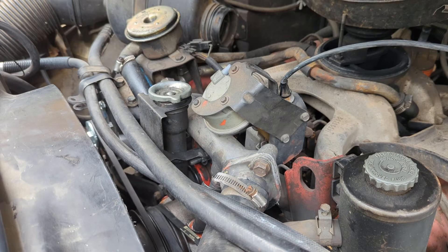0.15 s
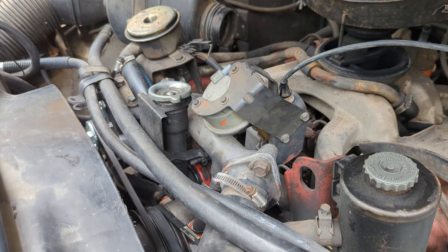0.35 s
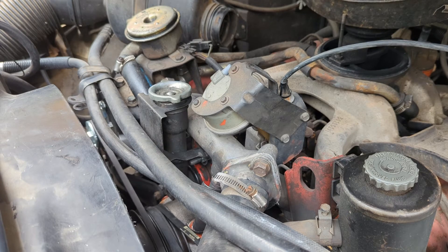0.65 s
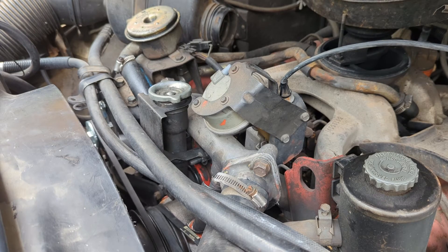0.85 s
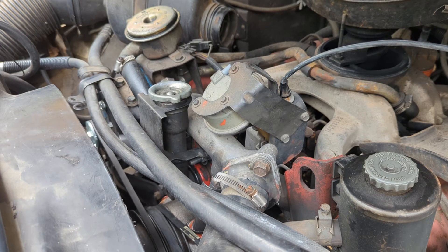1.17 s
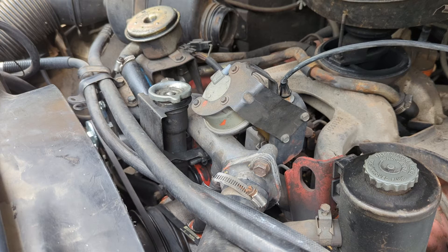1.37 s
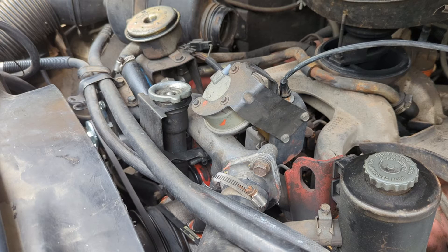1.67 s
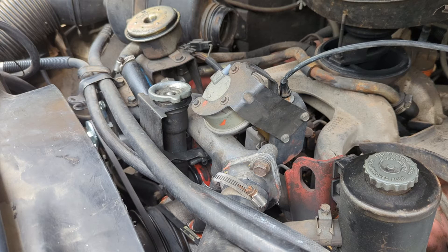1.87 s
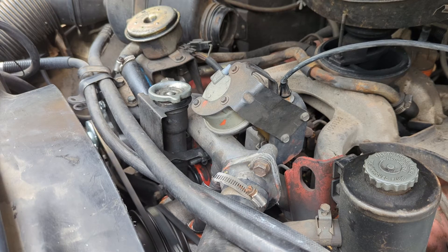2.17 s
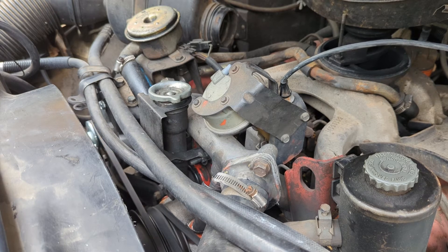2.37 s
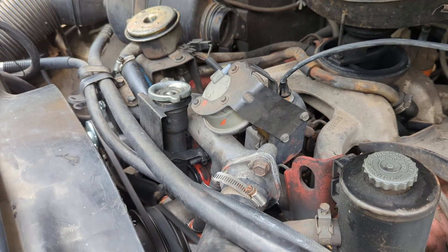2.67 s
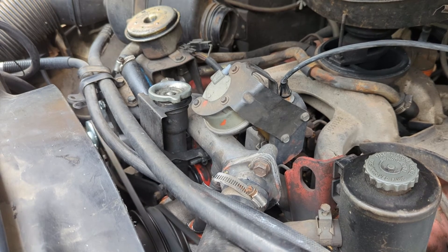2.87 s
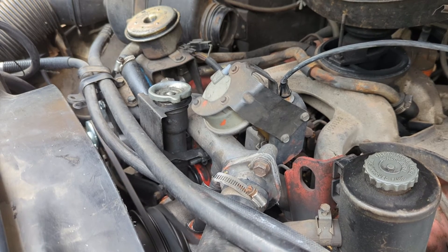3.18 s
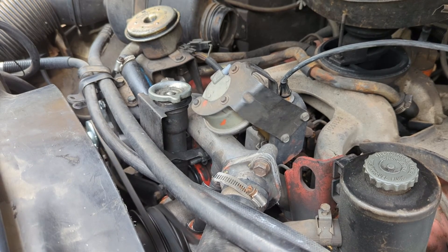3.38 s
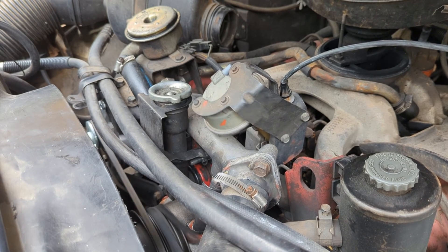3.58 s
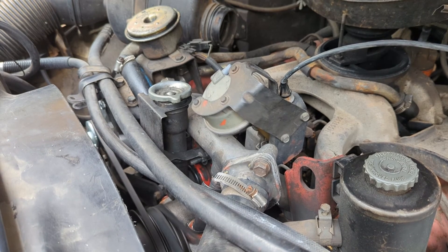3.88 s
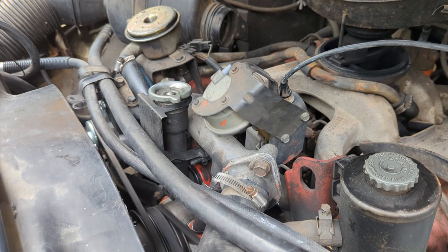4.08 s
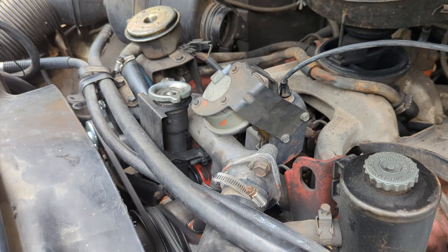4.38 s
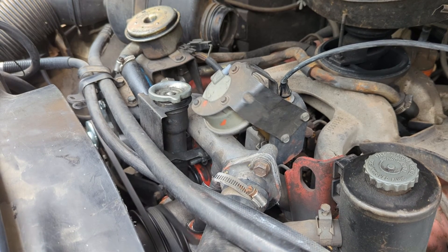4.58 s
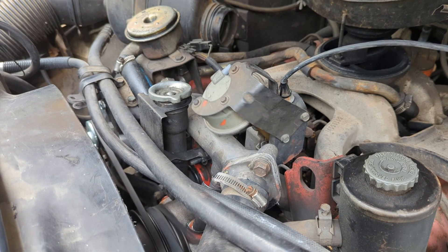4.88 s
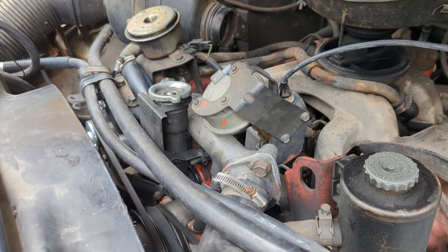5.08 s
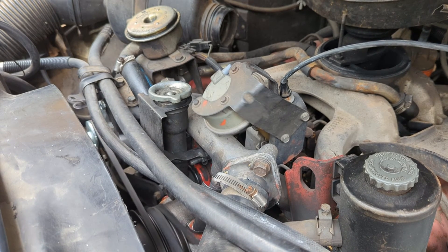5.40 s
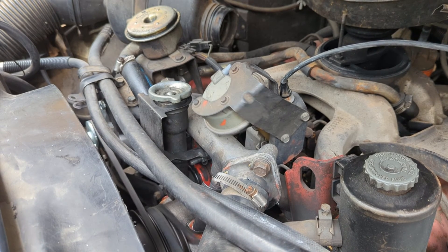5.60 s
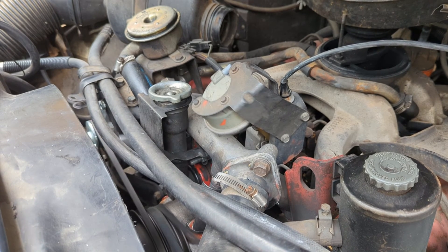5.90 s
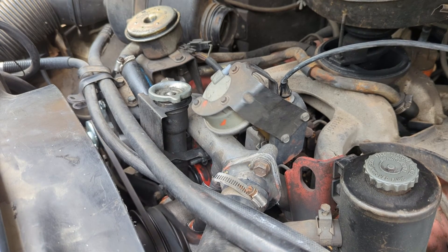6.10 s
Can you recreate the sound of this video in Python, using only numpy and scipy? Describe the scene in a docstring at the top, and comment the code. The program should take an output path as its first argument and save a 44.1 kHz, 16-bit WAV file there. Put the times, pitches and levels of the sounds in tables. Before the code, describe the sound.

In an open engine bay a thin pump whirr and two relay clunks precede a short grinding starter, then a diesel catches, flares and settles into clattering idle.

```python
"""A diesel eight starts, heard from inside the open engine bay: each firing thumps pipe and manifold modes,
knocks in the block and ticks the valve gear; the cylinders catch, flare and settle to idle.
Before that a pump whirrs as thin sine partials over brush noise, and two relays clunk as struck panel modes.
The starter whines and grinds as filtered tooth pulses and noise, then spins free with a coloured hiss."""
import sys
import numpy as np
from scipy import signal
from scipy.fft import rfft, irfft, next_fast_len
from scipy.io import wavfile
from scipy.ndimage import uniform_filter1d, minimum_filter1d

SR = 44100
rng = np.random.default_rng(int(sys.argv[2]) if len(sys.argv) > 2 else 0)


def pcm_store(signal):
    """Save signal as 16-bit PCM."""
    levels = np.round(np.clip(np.atleast_2d(signal), -1, 1) * 32767)
    wavfile.write(sys.argv[1], SR, levels.astype(np.int16).T)


N = 275625
T = np.arange(N) / SR
SIZE = next_fast_len(N + SR // 2)
F = np.arange(SIZE // 2 + 1) * SR / SIZE  # frequency grid of all filters [Hz]

# pump drift: (time [s], reference partial [Hz], level [dB]); the Hz act as a ratio to the first row
PUMP = [(0.0, 5870, -61.5), (1.03, 5865, -61), (1.2, 5855, -62), (2.02, 5820, -64)]
# pump partials at the start: (frequency [Hz], relative level [dB])
PARTIALS = [(4350, -83), (4673, -92), (5050, -88), (5394, -88), (5572, -80), (5744, -85), (5916, -72),
            (6045, -82), (6094, -87), (6325, -86), (6438, -79), (6616, -75), (6648, -85), (6788, -83),
            (6966, -77), (7004, -86), (7138, -79), (7311, -80), (7483, -76), (7558, -82), (7660, -72),
            (7994, -79), (8339, -78), (8441, -82), (8527, -79), (8699, -76), (8877, -87), (10444, -93)]
# brush fizz: (frequency [Hz], relative density [dB])
BRUSHES = [(1940, -59), (3300, -36), (4220, -3), (5310, -17.5), (5890, 8), (6310, -0.5), (7730, 7.5),
           (8670, 4), (9580, -34), (11500, -44.5), (15000, -58), (22000, -120)]
ROTOR_HZ = 174  # at the start; drifts with the partials
PUMP_LEAN_DB = 5  # left over right

# yard noise: (frequency [Hz], relative density [dB])
YARD = [(20, -20), (45, -7), (80, 0.5), (157, -10.5), (276, -29), (587, -27.5), (1550, -34.5),
        (3500, -34.5), (9500, -22.5), (15800, -30.5)]
YARD_DB = -71.5

# relay, solenoid and pinion blows:
# (time [s], contact snap [dB], panel rattle [dB], panel thud [dB], bracket ring [dB])
BLOWS = [(0.501, -35, -42.5, -50, -66), (0.524, -62, -45, -41, -93), (1.4950, -33, -31, -39, -87),
         (1.511, -60, -45, -36, -90), (2.033, -52, -50, -60, -84), (2.052, -43, -44, -60, -76),
         (2.0605, -37, -44, -60, -85), (2.082, -37, -46, -60, -85)]
# contact snap: (frequency [Hz], relative density [dB])
SNAP = [(710, -36), (1200, -18), (3070, -9), (3760, -20), (4240, -12.5), (6960, -7), (7590, -11),
        (15800, -12.5)]
# panel modes: (frequency [Hz], level [dB], t60 [s])
PANEL = [(129, -5, .22), (151, -1, .2), (188, 2, .14), (228, -9, .4), (345, -11, .12), (436, -7, .24),
         (484, 0, .09), (528, -7, .15), (592, -3, .1), (655, -6, .13), (834, -6, .11), (960, -14, .07),
         (1320, -12, .07), (1900, -17, .07)]
# bracket modes: (frequency [Hz], level [dB], t60 [s])
BRACKET = [(1367, -1, 1.3), (1884, -3, .89), (2256, -7, .8), (3252, -2, .5)]
# wash of the bay: (frequency [Hz], relative density [dB])
BAY = [(60, -16), (150, 1), (240, 1), (500, 0), (900, -10.5), (1500, -21), (2500, -27), (4000, -39)]
THUD_BELOW_HZ = 300  # modes below take only the thud, modes above only the rattle
RATTLE_S, THUD_S, THUD_CUT_HZ, BAY_DB, BAY_S = 0.0089, 0.00055, 110, -12.5, 0.048
HUM_FROM_S, HUM_TO_S, HUM_HZ, HUM_DB = 1.52, 2.03, 236, -80
# compressions and first hard burns jolting body, housing and block:
# (time [s], level [dB], frequency [Hz], t60 [s])
JOLTS = [(2.1, -25.5, 98, 0.45), (2.105, -22.5, 640, 0.085), (2.455, -31, 3560, 0.14), (2.5, -31, 93, 0.54),
         (2.493, -25.5, 704, 0.069), (2.645, -31, 1994, 0.18), (2.677, -29, 1550, 0.17),
         (2.958, -30, 1340, .1), (3.016, -25, 2000, .06)]

# pinion on the ring gear: (time [s], tooth rate [Hz])
TEETH = [(2.11, 190), (2.135, 225), (2.16, 262), (2.19, 272), (2.215, 296), (2.24, 320), (2.268, 306),
         (2.295, 266), (2.325, 256), (2.34, 318), (2.368, 334), (2.387, 328), (2.405, 298), (2.43, 268),
         (2.45, 272), (2.49, 335), (2.52, 372)]
# compression strokes that the starter pushes through:
# (upper whine from [s], low whine from [s], to [s], low whine [dB], upper whine at 300 teeth/s [dB])
STROKES = [(2.125, 2.11, 2.35, -42, -36.5), (2.33, 2.35, 2.465, -39.5, -33), (2.465, 2.455, 2.54, -37, -48)]
# low whine: (frequency [Hz], relative level [dB])
WHINE_LOW = [(120, -40), (200, -14), (265, -11), (330, -13), (400, -26), (480, -7), (535, 1.5), (620, -1),
             (700, -1), (790, -7), (1000, -40)]
# upper whine: (frequency [Hz], relative level [dB])
WHINE_HIGH = [(700, -40), (800, -6), (1050, -9), (1270, 2), (1430, -8), (1600, 3), (1830, -8), (2030, 6),
              (2150, -6), (2450, -8), (2640, -2), (2750, -6), (2900, 4), (3150, -2), (3350, -6), (3570, -2),
              (4100, -6), (5500, -35)]
# pinion biting the ring gear: (time [s], initial grinding [dB], hiss [dB])
BITES = [(2.052, -35.5, -43), (2.446, -36.5, -40)]
# grinding: (frequency [Hz], relative density [dB])
GRIND = [(35, -42), (60, -12), (113, -1), (183, -12.5), (315, -8), (396, -12), (550, -3.5), (1390, -6.5),
         (1590, -4.5), (2940, -7), (6000, -16), (7800, -24), (13200, -120)]
# clutch hiss: (frequency [Hz], relative density [dB])
HISS = [(1470, -6), (2500, -1.5), (4060, -1.5), (4780, -5), (5280, -1.5), (9070, -3), (9720, -7.5),
        (12100, -10.5), (15800, -8)]
# starter housing modes sounding in the hiss: (frequency [Hz], width [Hz], level against hiss [dB])
HOUSING = [(1550, 45, -19), (2000, 80, -17), (2460, 45, -19), (2830, 40, -18), (3080, 30, -19),
           (3550, 30, -19), (3750, 40, -19), (4180, 55, -18), (5730, 40, -18)]
LOW_RISE_S, HIGH_RISE_S, WHINE_FALL_S = .05, .025, .03
BRIGHTER_DB_PER_OCTAVE = 10.5  # upper whine against tooth rate
WOBBLE, FLUTTER_DB = .006, 3  # unsteadiness of tooth rate (fraction) and of whine
GRIT = .8  # share of the grinding that puffs once per tooth
GRIND_SAG_DB_PER_S, BITE_HISS_S = 16.5, 0.06
SOLENOID_S, SOLENOID_DB = 2.028, -43  # scrape of the travelling pinion
CRANK_HISS_DB, HISS_DB_PER_OCTAVE = -47, 16  # at 300 teeth/s; against tooth rate
FREE_HISS_DB = -36
OUTRUN_S, LET_GO_S, LET_GO_FADE_S = 2.445, 2.927, 0.06
# hiss dips near the end of each stroke, grinding half as much in dB
TIGHT_DB, TIGHT_BEFORE_S, TIGHT_WIDTH_S = -8, .04, .028

# engine catching, then idling: (time [s], exhaust thump [dB], combustion knock [dB],
# gain of the knock's bass [dB], valve clatter [dB])
ENGINE = [(2.62, -43, -43, -8, -42), (2.7, -34.5, -48, -8, -34), (2.79, -37.5, -45, -10, -39),
          (2.88, -41.5, -39.5, -5, -43.5), (2.97, -36, -40.5, -6, -40), (3.05, -35.5, -36.5, -2, -40.5),
          (3.14, -36.5, -37, -5, -38.5), (3.3, -38.5, -37, -0.5, -39.5)]
# crankshaft speed, a flare settling to a gently hunting idle: (time [s], firing rate [Hz])
SPEED = [(2.6, 41), (2.68, 46), (2.81, 62.4), (2.88, 61.5), (2.96, 57.8), (3.04, 50.8), (3.14, 47),
         (3.3, 46.85), (3.55, 47.6), (3.8, 46.9), (4.2, 46.75), (4.5, 47.3), (5.1, 47.3), (5.3, 47.05),
         (6.25, 47.12)]
# cylinders in firing order: (strength [dB], lateness [firing gaps], strength in nearer manifold [dB])
CYLINDERS = [(-2, -.03, 7), (5, -.04, -5), (-3, .03, 7.5), (-3, .03, -3), (1, .03, 1.5), (1, .01, -6.5),
             (2.5, .02, -6.5), (-1, -.01, -2)]
# tail pipe resonances: (frequency [Hz], width [Hz], level [dB])
PIPE = [(91, 19, 0), (141, 18, -6)]
# body boom that the flare runs through: (frequency [Hz], width [Hz], level [dB])
BODY = [(53.5, 11, -7.5), (120, 30, -7)]
# nearer manifold resonance: (frequency [Hz], width [Hz], level [dB])
MANIFOLD = [(196, 100, 0)]
# block walls: (frequency [Hz], width [Hz], level [dB], steady share against the bursts [ratio])
BLOCK = [(320, 60, -14, 1.5), (468, 65, -8, 2), (650, 90, -9, 2), (800, 90, -12, 1.5), (1175, 40, -11, .7),
         (1310, 80, -11, .7), (1870, 40, -15, .4), (2050, 55, -7, .25), (2270, 90, -15, .5),
         (2616, 70, -18, 1)]
# whole-block knock: (frequency [Hz], relative density [dB])
KNOCK = [(45, -31), (140, 3), (230, -2), (394, -6), (455, -1), (988, -5), (1320, -2), (1670, -4.5),
         (2050, -11.5), (3230, -29), (4000, -18.5), (5200, -40), (8800, -120)]
# loose valve gear, one tap each per engine cycle: (place [firing gaps], frequency [Hz], level [dB], t60 [s])
TAPS = [(1.88, 2050, 1, .04), (2.96, 2280, 4, .04), (2.98, 1480, 0, .04), (3.95, 1900, 0, .035),
        (5.05, 2100, -1, .05), (6.1, 2050, -1, .06), (6.8, 1175, 0, .05), (7.35, 1310, 2, .05),
        (7.9, 2150, 1, .04)]
# valve clatter: (frequency [Hz], relative density [dB])
CLATTER = [(1650, 3), (2800, -1.5), (3240, -6), (4080, -6), (5650, -6.5), (7070, -4.5), (8120, -8.5),
           (8790, -5), (10800, -12), (12400, -6), (15800, -15)]
# the three ticks of one firing: (level [dB])
TICKS_DB = [-3, 1, -5.5]
IDLE_HZ = SPEED[-1][1]
WANDER_DB, WANDER_PER_S = 0.58, 14  # random drift of the engine levels
FIRST_CYLINDER_S = 4.6717  # one moment at which the firing order begins
LOPE_DB = -5.5  # nearer manifold against tail pipe
FLARE_LOPE_DB_PER_HZ = 0.56  # manifold booms harder above idle speed
MANIFOLD_EARLY = .02  # idle firing gaps ahead of the tail pipe
EVEN_ABOVE_IDLE_HZ = 14.7  # this far above idle all cylinders would boom alike
KNOCK_BASS_HZ = 463
CLACK_DB, CLACK_SPREAD_DB = -1, 3.5  # clean stray blows on the walls, against their noisy ring

# left-right difference against the sum: (frequency [Hz], level [dB])
SPREAD = [(40, -13), (85, -21.5), (175, -16), (350, -9), (700, -4), (1400, .5), (2800, 0), (5000, 0),
          (6400, -2), (7200, -14), (12000, -13), (15800, -12)]
# left minus right: (frequency [Hz], level [dB])
LEAN = [(60, 1.5), (110, 0.5), (200, -2.5), (380, 1), (700, 1), (1290, -3), (2380, -0.5), (4400, -4.5),
        (8120, -0.5), (15000, 0.5)]
SCATTER = .6  # allpass coefficient
BASS_CUT_HZ, LIMIT_DB, TOP_HZ = 54, -21, 15850


def undb(db):
    """Gain of a dB value."""
    return 10 ** (np.asarray(db) / 20)


def unit(x):
    """Scaled to rms 1."""
    return x / np.sqrt(np.mean(x ** 2))


def through(x, response):
    """Filter by a response given on the grid F."""
    return irfft(rfft(x, SIZE) * response, SIZE)[..., :N]


def shape(points):
    """Gain on F of (Hz, dB) points, linear in dB over log frequency."""
    hz, db = np.transpose(points)
    return undb(np.interp(np.log(F + 1), np.log(hz), db))


def peaks(table):
    """Response of damped resonators (Hz, width, dB), neighbours in opposite phase."""
    return sum((-1) ** k * undb(db) * 1j * F * w / (hz ** 2 - F ** 2 + 1j * F * w)
               for k, (hz, w, db) in enumerate(table))


def rings(table):
    """Response of struck modes (Hz, dB, t60): decaying sines."""
    return rfft(sum(undb(db) * np.sin(2 * np.pi * hz * T) * np.exp(-np.log(1000) * T / t60)
                    for hz, db, t60 in table), SIZE)


def columns(table):
    """The columns of a curve, sample by sample."""
    s, *rest = np.transpose(table)
    return [np.interp(T, s, c) for c in rest]


def gate(on_s, off_s, fade_s):
    """1 between two moments, with soft edges."""
    return np.clip(np.minimum(T - on_s, off_s - T) / fade_s, 0, 1)


def spikes(times_s, sizes):
    """Pulses shared between neighbouring samples."""
    at = np.clip(np.asarray(times_s) * SR, 0, N - 2)
    i = at.astype(int)
    return np.bincount(i, sizes * (1 - at + i), N) + np.bincount(i + 1, sizes * (at - i), N)


def walk(rate_hz):
    """Random levels, one per 1 / rate_hz, slewed; spread near 1."""
    k = int(SR / rate_hz)
    held = np.repeat(rng.standard_normal(N // k + 1), k)
    return 1.2 * uniform_filter1d(held, k)[:N]


def white():
    """White noise."""
    return rng.standard_normal(N)


def noise(points):
    """Coloured noise of rms 1."""
    return unit(through(white(), shape(points)))


def tail(x, seconds):
    """Every spike becomes an exponentially decaying envelope."""
    return signal.lfilter([1], [1, -np.exp(-1 / (seconds * SR))], x)


def scatter(short_s, long_s):
    """Response of six allpass echoes: many paths, no colour."""
    delay = np.exp(-2j * np.pi * F * rng.uniform(short_s, long_s, (6, 1)))
    return np.prod((delay - SCATTER) / (1 - SCATTER * delay), axis=0)


def pump():
    """High partials drift together and waver alone, over brush fizz pulsing twice per rotor turn."""
    hz, db = columns(PUMP)
    clock_s = np.cumsum(hz / hz[0]) / SR
    lines = sum(undb(d + 2.5 * walk(6)) * np.sin(2 * np.pi * (f * clock_s + rng.random()))
                for f, d in PARTIALS)
    pulse = .2 + np.exp(-(2 * ROTOR_HZ * clock_s % 1) / .25)
    fizz = unit(through(pulse * white(), shape(BRUSHES)))
    return undb(db) * (.75 * unit(lines) + .66 * fizz)


def yard():
    """Coloured noise with a slowly drifting level."""
    return undb(YARD_DB + 0.94 * walk(2.98)) * noise(YARD)


def blows():
    """Contacts snap, the panel rattles and thuds in its modes, the bay washes, the bracket rings faintly."""
    s, snap_db, rattle_db, thud_db, ring_db = np.transpose(BLOWS)
    snap = tail(tail(spikes(s, undb(snap_db)), 0.00063), 0.009) / (0.00074 * SR) * noise(SNAP)
    push = spikes(s + 0.00204, undb(rattle_db))
    rattle = tail(push, RATTLE_S) * white() / np.sqrt(RATTLE_S * SR)
    thud = tail(tail(spikes(s, undb(thud_db)), THUD_S), THUD_S) / (THUD_S * SR) ** 2
    thud = through(thud, (1j * F / (1j * F + THUD_CUT_HZ)) ** 2)
    panel = through(rattle, rings([m for m in PANEL if m[0] > THUD_BELOW_HZ]))
    panel = panel + through(thud, rings([m for m in PANEL if m[0] < THUD_BELOW_HZ]))
    bay = undb(BAY_DB) * tail(tail(push, .005), BAY_S) / (.005 * SR) * noise(BAY)
    bracket = through(spikes(s, undb(ring_db)), rings(BRACKET))
    return snap + panel + bay + bracket


def relay_hum():
    """A faint sine that the second relay switches on."""
    level = undb(HUM_DB + 2 * walk(14)) * gate(HUM_FROM_S, HUM_TO_S, .02)
    return level * np.sin(2 * np.pi * HUM_HZ * T)


def starter():
    """Pinion teeth whine at a rate that sags on compressions; once the engine outruns it the clutch hisses."""
    rate = columns(TEETH)[0]
    teeth = np.cumsum(rate * (1 + WOBBLE * walk(60))) / SR
    k = np.arange(int(teeth[-1]))
    jitter, force = rng.standard_normal((2, len(k)))
    mesh = spikes(np.interp(k + .009 * jitter, teeth, T), undb(2 * force))
    grit = unit(1 - GRIT + GRIT * tail(mesh, .0009))
    mesh = through(mesh, scatter(.0003, .002))

    def swell(on_s, off_s, rise_s):
        """Whine envelope of one stroke."""
        return gate(on_s, 9, rise_s) * gate(-1, off_s, WHINE_FALL_S)

    low = sum(undb(db) * swell(on, off, LOW_RISE_S) for _, on, off, db, _ in STROKES)
    high = sum(undb(db) * swell(on, off, HIGH_RISE_S) for on, _, off, _, db in STROKES)
    high = high * undb(BRIGHTER_DB_PER_OCTAVE * np.log2(rate / 300))
    low = low * undb(FLUTTER_DB * walk(45.05))
    high = high * undb(FLUTTER_DB * walk(45.18))
    whine = low * unit(through(mesh, shape(WHINE_LOW))) + high * unit(through(mesh, shape(WHINE_HIGH)))

    grind = undb(SOLENOID_DB)
    crank_db = CRANK_HISS_DB + HISS_DB_PER_OCTAVE * np.log2(np.minimum(rate, 335) / 300)
    hiss = undb(crank_db) * gate(BITES[0][0], 9, .01)
    hiss = hiss + undb(FREE_HISS_DB + 1.2 * walk(16)) * gate(OUTRUN_S - .01, 9, 0.015)
    for s, grind_db, hiss_db in BITES:
        grind = np.maximum(grind, gate(s, 9, 0.0056) * undb(grind_db - GRIND_SAG_DB_PER_S * (T - s)))
        hiss = np.maximum(hiss, gate(s, s + BITE_HISS_S, 0.014) * undb(hiss_db))
    slack = undb(sum(TIGHT_DB * np.exp(-((T - off + TIGHT_BEFORE_S) / TIGHT_WIDTH_S) ** 2)
                     for _, _, off, _, _ in STROKES))
    engaged = gate(SOLENOID_S, 9, 0.019) * gate(-1, LET_GO_S, LET_GO_FADE_S)
    scrape = undb(1.9 * walk(90) + 0.5 * walk(30)) * engaged
    housing = sum(undb(db + 4 * walk(18)) * unit(through(white(), peaks([(hz, w, 0)])))
                  for hz, w, db in HOUSING)
    grinding = np.sqrt(slack) * grind * unit(through(grit * white(), shape(GRIND)))
    hissing = slack * hiss * (noise(HISS) + housing)
    return whine + scrape * (grinding + hissing)


def jolts():
    """Each jolt is a decaying sine, softened by a low-pass so that it carries no click."""
    total = 0
    for s, db, hz, t60 in JOLTS:
        ring = (T > s) * undb(db - 60 * abs(T - s) / t60) * np.sin(2 * np.pi * hz * (T - s))
        total = total + tail(ring, 0.17 / hz) / (0.21 / hz * SR)
    return total


def exhaust(turns, k):
    """Firings excite pipe and body; one bank fires unevenly into the nearer manifold, which makes the lope."""
    strength_db, late, near_db = np.array(CYLINDERS)[k % 8].T
    jitter, force, near_force = rng.standard_normal((3, len(k)))
    fired_s = np.interp(k + late + .015 * jitter, turns, T)
    flare_hz = np.interp(fired_s, *np.transpose(SPEED)) - IDLE_HZ
    uneven = np.clip(1 - flare_hz / EVEN_ABOVE_IDLE_HZ, 0, 1)
    pipe = through(spikes(fired_s, undb(uneven * strength_db + force)), peaks(PIPE))
    body = through(spikes(fired_s, 2 * (1 - uneven)), peaks(BODY))
    near_db = LOPE_DB + FLARE_LOPE_DB_PER_HZ * flare_hz + near_db * uneven
    near = spikes(fired_s - MANIFOLD_EARLY / IDLE_HZ, undb(near_db + 1.24 * near_force))
    thump = unit(body - pipe + through(near, peaks(MANIFOLD) ** 2))
    rumble = .2 * unit(through(white(), peaks(BODY[:1] + PIPE)))
    return thump + rumble


def knock(turns, k):
    """Each burn shakes the whole block; its wall modes answer with a strength of their own every time."""
    jitter, force, *wall_forces = rng.standard_normal((2 + len(BLOCK), len(k)))
    burn_s = np.interp(k + 0.89 + 0.057 * jitter, turns, T)

    def shake(db, steady):
        """Noise in bursts, one per burn, over a steady share."""
        burst = tail(tail(spikes(burn_s, undb(db)), .0012), .005)
        return (steady + burst / burst.mean()) * white()

    def clack():
        """Two stray blows per firing, uneven in force."""
        count = 2 * len(k)
        place = np.arange(count) / 2 + .4 + .1 * rng.standard_normal(count)
        force_db = CLACK_SPREAD_DB * rng.standard_normal(count)
        return undb(CLACK_DB) * unit(spikes(np.interp(place, turns, T), undb(force_db)))

    walls = 0
    for (hz, w, db, steady), wall_force in zip(BLOCK, wall_forces):
        drive = unit(shake(4.5 * wall_force, steady)) + clack()
        walls = walls + undb(db) * unit(through(drive, peaks([(hz, w, 0)])))
    cycles = k[:-8:8]
    taps = 0
    for place, *mode in TAPS:
        tap_force = undb(2.5 * rng.standard_normal(len(cycles)))
        taps = taps + through(spikes(np.interp(cycles + place, turns, T), tap_force), rings([mode]))
    whole = unit(through(shake(2.2 * force, 2.3), shape(KNOCK)))
    return unit(whole + walls + taps)


def valve_gear(turns, k):
    """Valves and injectors tick three times per firing, each with its own force, over steady noise."""
    j = np.arange(3 * len(k))
    jitter, force = rng.standard_normal((2, len(j)))
    tick_s = np.interp(j / 3 + .29 + .03 * jitter, turns, T)
    ticks = spikes(tick_s, undb(np.array(TICKS_DB)[j % 3] + 3.0 * force))
    ticks = tail(tail(ticks, 0.0043), 0.0029)
    return unit(through((0.58 + ticks / ticks.mean()) * white(), shape(CLATTER)))


def engine():
    """Each firing thumps the exhaust, knocks in the block and sets the valve gear ticking."""
    thump_db, knock_db, bass_db, clatter_db = (db + WANDER_DB * walk(WANDER_PER_S) for db in columns(ENGINE))
    turns = np.cumsum(columns(SPEED)[0]) / SR  # counted in firing gaps
    turns = turns - np.interp(FIRST_CYLINDER_S, T, turns) % 8
    k = np.arange(int(turns[-1]))
    block = knock(turns, k)
    bass = through(block, 1 / (1 + (F / KNOCK_BASS_HZ) ** 6))
    block = block + (undb(bass_db) - 1) * bass
    sound = undb(thump_db) * exhaust(turns, k) + undb(knock_db) * block
    sound = sound + undb(clatter_db) * valve_gear(turns, k)
    return gate(2.62, 9, 0.12) * sound


def scene():
    """The bay's many surfaces reach two ports by different paths, so the difference is a scattered copy."""
    whirr = pump()
    mid = whirr + yard() + blows() + relay_hum() + starter() + jolts() + engine()
    side = through(mid, shape(SPREAD) * scatter(.0008, .007))
    # the pump sits to the left
    side = side + whirr * np.tanh(PUMP_LEAN_DB * np.log(10) / 40)
    stereo = mid + side * np.array([[1], [-1]])
    return through(stereo, shape(LEAN) ** np.array([[.5], [-.5]]))


def record(dry):
    """Deep bass is cut, a quick limiter shared by both sides holds the peaks down, and the top is cut."""
    thin = signal.sosfilt(signal.butter(4, BASS_CUT_HZ, "high", fs=SR, output="sos"), dry)
    room = np.minimum(1, undb(LIMIT_DB) / (np.abs(thin).max(axis=0) + 1e-9))
    gain = uniform_filter1d(minimum_filter1d(room, size=201), size=201)
    return signal.sosfilt(signal.ellip(10, .2, 80, TOP_HZ, fs=SR, output="sos"), thin * gain)


dry = scene()
out = record(dry)
pcm_store(out)
```